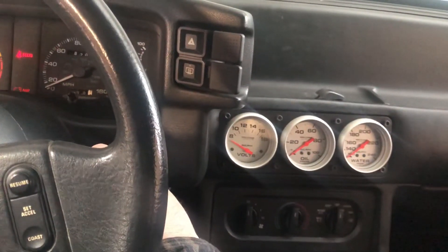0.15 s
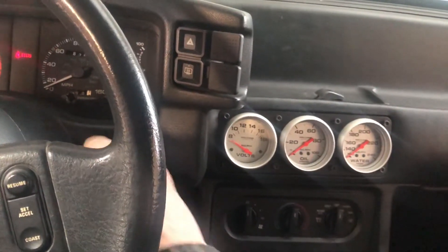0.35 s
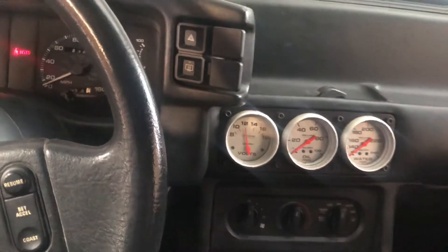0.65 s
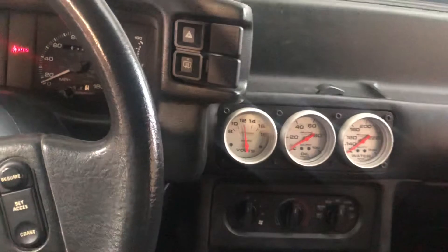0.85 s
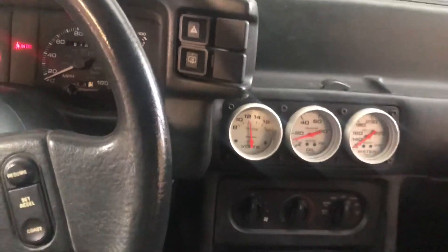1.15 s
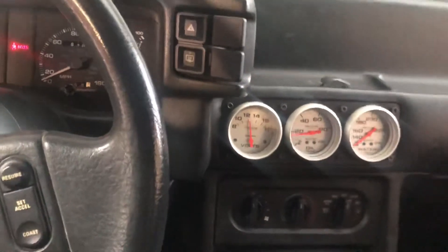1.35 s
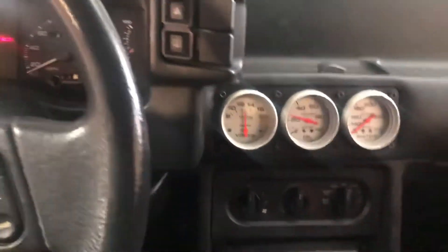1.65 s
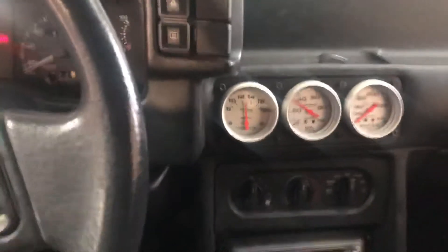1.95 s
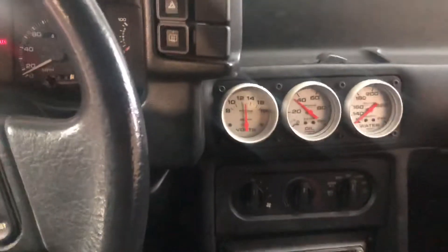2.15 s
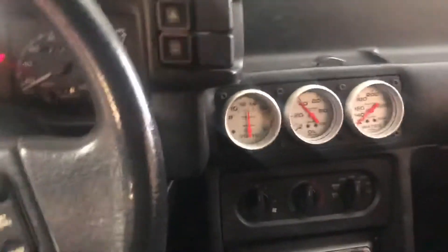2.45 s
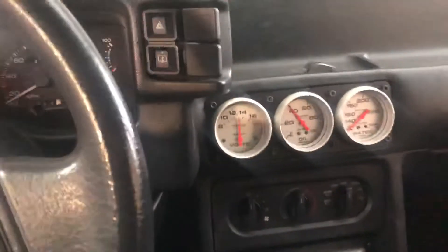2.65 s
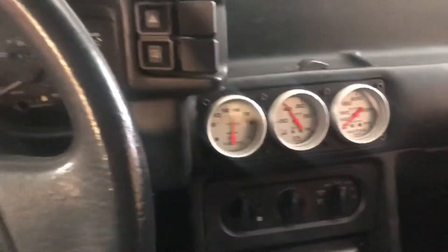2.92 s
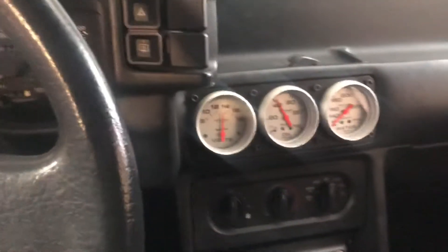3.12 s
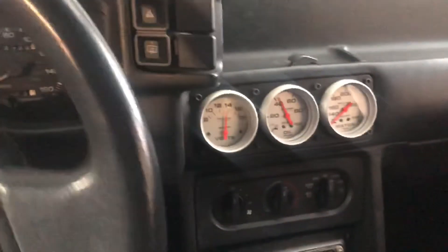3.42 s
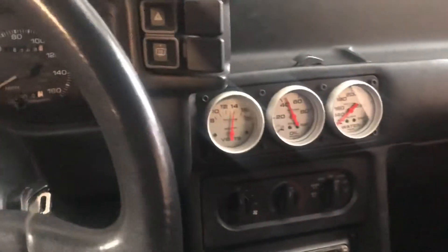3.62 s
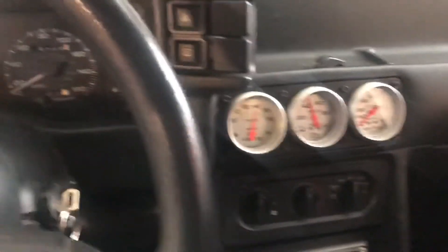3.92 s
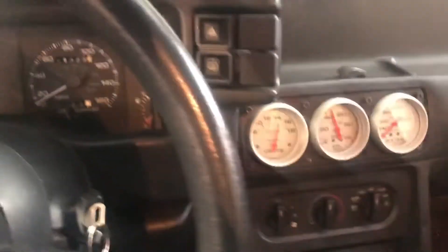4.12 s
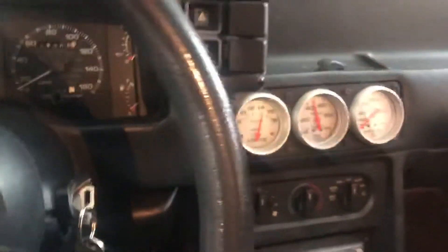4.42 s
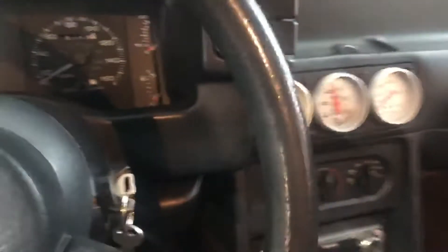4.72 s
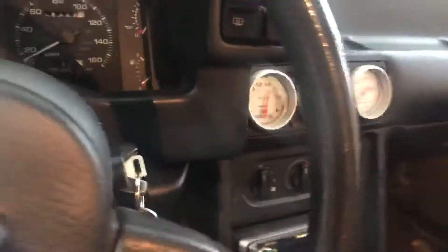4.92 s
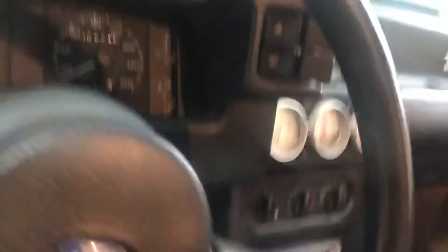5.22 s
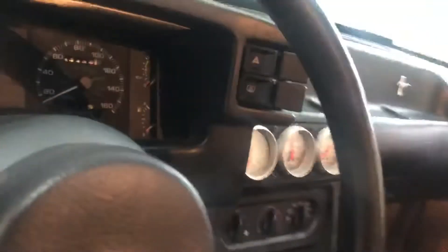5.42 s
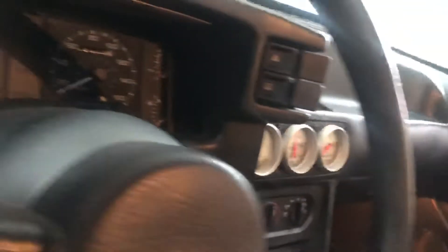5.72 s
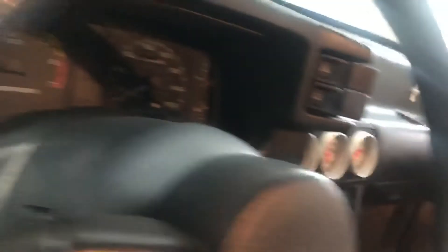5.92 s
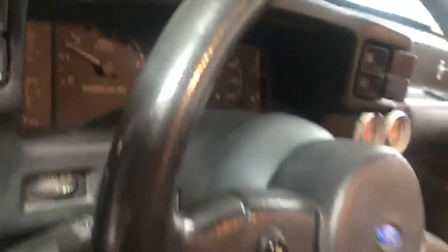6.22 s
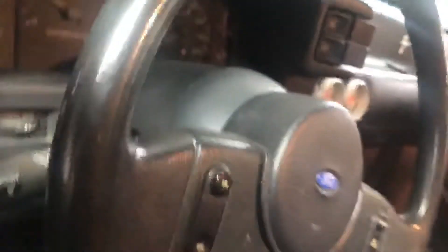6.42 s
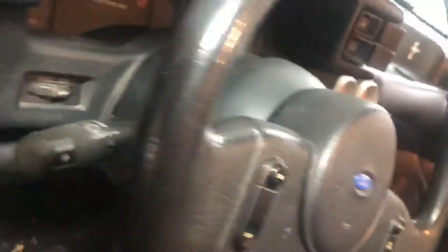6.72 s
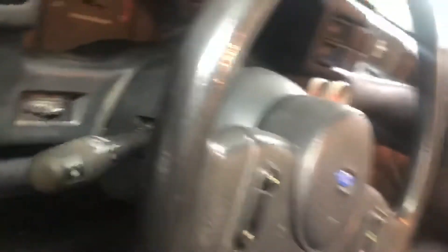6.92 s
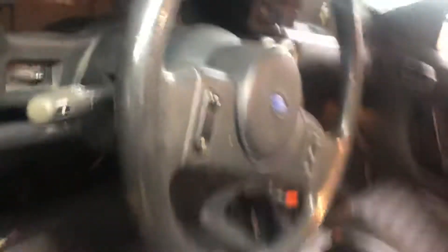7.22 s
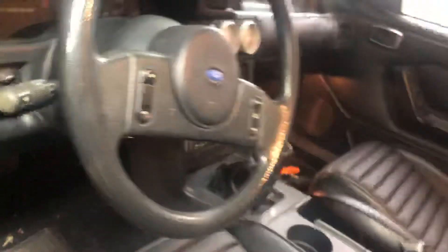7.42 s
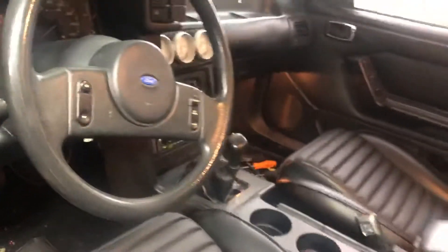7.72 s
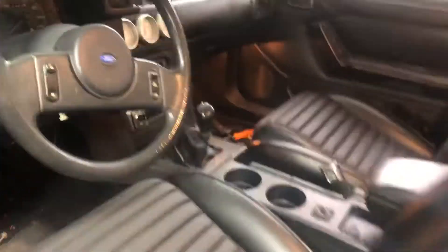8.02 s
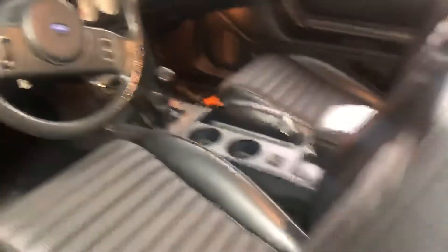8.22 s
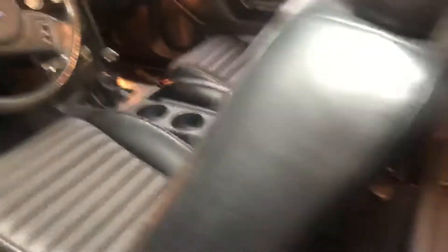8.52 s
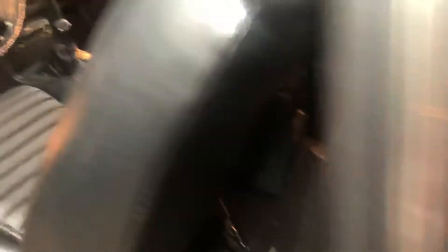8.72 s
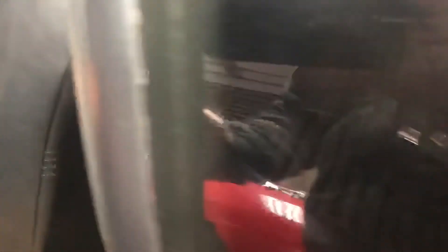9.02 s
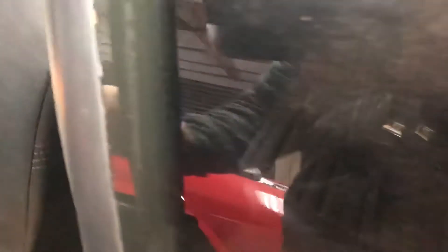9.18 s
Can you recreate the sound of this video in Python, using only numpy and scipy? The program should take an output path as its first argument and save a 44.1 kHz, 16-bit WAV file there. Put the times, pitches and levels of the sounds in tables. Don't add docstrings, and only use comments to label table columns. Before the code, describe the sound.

Close inside a parked car, a starter hums and grinds for a fraction of a second, then an eight-cylinder engine catches with a crack, flares loudly for about a second and settles to a throbbing, uneven fast idle. A sharp snap lands midway. Moving to the open door, the exhaust note grows stronger, brackets rattle, and the idle sags at the end.

```python
import sys
import numpy as np
from scipy import signal
from scipy.io import wavfile
from scipy.ndimage import uniform_filter1d

SR = 44100
rng = np.random.default_rng(int(sys.argv[2]) if len(sys.argv) > 2 else 0)


def how_loud(loudness_db):
    steps = np.asarray(loudness_db, float) / 20
    return 10 ** steps


def store_pcm(level_fs):
    pcm = np.round(np.clip(level_fs, -1, 1) * 32767).astype(np.int16)
    wavfile.write(sys.argv[1], SR, np.atleast_2d(pcm).T)


N = 412335


def rms_one(x):
    return x / np.sqrt(np.mean(x ** 2) + 1e-20)


def in_time(rows):
    s, *columns = np.transpose(rows)
    return [np.interp(np.arange(N) / SR, s, column) for column in columns]


def drift(rate_hz, size=1):
    r = np.exp(-80 * np.pi * rate_hz / SR)
    noise = rng.standard_normal(N // 40 + 2002)
    slow = signal.lfilter([1], [1, -2 * r, r * r], noise)[2000:]
    return np.interp(np.arange(0, N, size) / 40, np.arange(len(slow)), rms_one(slow))


def resonance(x, hz, width_hz):
    r = np.exp(-np.pi * width_hz / SR)
    ringing = [1, -2 * r * np.cos(2 * np.pi * hz / SR), r * r]
    return signal.lfilter([(1 - r * r) / 2, 0, (r * r - 1) / 2], ringing, x)


def rung(x, modes, skirt):
    out = 0
    for k, (hz, width_hz, db) in enumerate(modes):
        mode = resonance(resonance(x, hz, skirt * width_hz), hz, width_hz)
        out = out + (-1) ** k * how_loud(db) * rms_one(mode)
    return out / np.sqrt(uniform_filter1d(out ** 2, SR // 2))


def air_mode(puffs, hz, width_hz):
    mode = resonance(resonance(puffs, hz, width_hz), hz, width_hz)
    return mode / np.sqrt(uniform_filter1d(mode ** 2, SR // 10) + 1e-12)


def swell(rows):
    t = np.arange(0, N + 64, 64) / SR
    gain = 0
    for s, db, rise_s, fall_s in rows:
        away = np.maximum((s - t) / max(rise_s, .005), (t - s) / max(fall_s, .005))
        gain = gain + how_loud(db - 20 * away)
    return np.interp(np.arange(N) / SR, t, gain)


def coloured(spectrum, patchy_db):
    hz, db = np.transpose(spectrum)
    edges = np.geomspace(hz[0], hz[-1], int(4 * np.log2(hz[-1] / hz[0])) + 2)
    white, out = rng.standard_normal((2, N)), 0
    for k, (low, high) in enumerate(zip(edges, edges[1:])):
        band_pass = signal.butter(2, [low, high], "band", fs=SR, output="sos")
        band = signal.sosfilt(band_pass, white[k % 2])
        band_db = np.interp(np.log(low * high) / 2, np.log(hz), db)
        out = out + band * how_loud(band_db + patchy_db * drift(21.0))
    return rms_one(out)


def cabin(x, t60_s, wet_db):
    t = np.arange(SR // 4) / SR
    tail = rng.standard_normal(len(t)) * how_loud(-60 * t / t60_s) * (t > .002)
    wet = signal.fftconvolve(x, tail / np.sqrt(np.sum(tail ** 2)))[:N]
    return (x + how_loud(wet_db) * wet) / np.sqrt(1 + how_loud(2 * wet_db))


# time_s, hum_hz, hum_db, rumble_db, whine_db
STARTER_TURN = [
    (0, 262, -33, -40, -45),
    (.05, 254, -34, -42, -39.5),
    (.1, 265, -38, -48, -48),
    (.14, 270, -71, -70, -70),
]


def starter():
    hz, hum_db, rumble_db, whine_db = in_time(STARTER_TURN)
    noise, t = rng.standard_normal(N), np.arange(N) / SR
    hum = how_loud(hum_db) * np.sin(2 * np.pi * np.cumsum(hz) / SR)
    rumble = how_loud(rumble_db) * rms_one(resonance(noise, 210, 310))
    whine = how_loud(whine_db) * rms_one(resonance(noise, 1570, 98))
    brush_hiss = rms_one(resonance(resonance(noise, 8000, 9000), 8000, 9000))
    brush = how_loud(whine_db + 1) * np.clip(t / .04, 0, 1) * brush_hiss
    crack_gain = how_loud(-16.0 - 60 * np.abs(t - .108) / 0.18) * (t > .108)
    crack = crack_gain * rms_one(resonance(noise, 1800, 2100))
    return (hum + rumble + whine + brush) * (t < .15) + crack


GRIND_DB = 15


def starter_grind_db():
    t = np.arange(N) / SR
    let_go_s = 0.455
    meshed = GRIND_DB * np.clip(1 + (t - 0.12) / 0.12, 0, 1)
    spin_down = 10.5 * np.clip(1 - (t - let_go_s) / 0.55, 0, 1)
    return uniform_filter1d(np.where(t < let_go_s, meshed, spin_down), size=SR // 40)


# pitch_hz, level_db
GEAR_TONES = [(2471, -49), (2643, -45), (4538, -39), (4780, -42), (5313, -46), (5642, -48), (6255, -45),
              (6654, -45)]


def gear_song(grind_db):
    noise = rng.standard_normal(N)
    tones = sum(how_loud(db) * rms_one(resonance(noise, hz, 30)) for hz, db in GEAR_TONES)
    return how_loud(3.5 + 2.8 * (grind_db - GRIND_DB)) * tones


# time_s, change_db, half_width_s
FLURRIES = [(.15, 1.5, .07), (.125, 2, 0.015), (.162, 2.5, .012), (.215, 2.5, .02), (.265, 1.5, .012),
            (.37, 1, .015), (.41, 1, 0.018), (.31, -1.8, .03), (1.3, 2, .025), (3.5, 0.5, 0.024),
            (5.19, -1.5, 0.014), (6.17, 1.2, 0.076), (8.76, -2.5, 0.033), (9.02, -6.5, 0.055),
            (9.18, -8.5, 0.054), (9.3, 7, 0.014)]


def flurries_db():
    t = np.arange(0, N + 32, 32) / SR
    change_db = sum(db * np.exp(-((t - s) / width_s) ** 2) for s, db, width_s in FLURRIES)
    return np.interp(np.arange(N) / SR, t, change_db)


# start_s, level_db, pitch_hz, length_s
CLATTER = [(5.06, -36, 2300, .03), (5.085, -37, 2120, 0.032), (5.147, -41, 2210, .03),
           (5.221, -44, 2320, .02), (6.094, -37, 1770, .02), (6.389, -40, 1990, .02),
           (6.575, -36, 1400, .025), (6.67, -42, 2650, .03), (6.72, -39, 1930, .02), (6.76, -33, 1350, .02),
           (6.808, -40, 2500, .015), (6.915, -35, 2700, .012), (7.033, -40, 2280, 0.027),
           (7.08, -44, 2250, 0.045)]


def clatter(grit):
    out, t = np.zeros(N), np.arange(SR // 8) / SR
    for s, db, hz, length_s in CLATTER:
        at = round(s * SR)
        ring = rms_one(resonance(grit[at:at + len(t)], hz, 140))
        fade = how_loud(db - 20 * np.maximum(t - length_s, 0) / 0.013)
        out[at:at + len(t)] += fade * np.minimum(t / .004, 1) * ring
    return out


# pitch_hz, level_db (per Hz)
RASP = [(560, -74), (950, -12), (1000, -3.5), (1170, -3.5), (1440, -5), (2180, -7.5), (2820, -11),
        (3190, -12), (3630, -13), (4760, -12), (6000, -18.5), (7800, -25.5), (13200, -120)]
# pitch_hz, level_db (per Hz)
HISS = [(2940, -7), (5000, -8), (8470, -8.5), (15100, -10), (15700, -10)]
# pitch_hz, width_hz, level_db
COVERS = [(1536, 50, -16), (1930, 24, -26), (2240, 150, -12.5), (2470, 73, -30), (4520, 560, -21),
          (6970, 180, -28)]


def engine_bay(cycles, rasp_db, hiss_db):
    leak_opens = np.clip(np.arange(N) / SR - .3, 0, 1)
    puff = (np.exp(-2.5 * ((cycles - .48) % 1)) - .4) * leak_opens
    tick = np.exp(-3.0 * (8 * cycles % 1)) - .3
    grit = rng.standard_normal(N) * how_loud(2.5 * np.minimum(rng.exponential(1, N), 5))
    ringing = 0
    for hz, width_hz, db in COVERS:
        ringing = ringing + how_loud(db + 2.2 * drift(9.0)) * rms_one(resonance(grit, hz, width_hz))
    rasp = cabin(rms_one(coloured(RASP, patchy_db=2.5) + ringing), t60_s=0.067, wet_db=-8.0)
    hiss = cabin(coloured(HISS, patchy_db=2.0), t60_s=0.15, wet_db=-32.0)
    rasp = how_loud(rasp_db + 3.2 * puff + 0.38 * tick) * rasp
    hiss = how_loud(hiss_db + 3.4 * puff + 0.5 * tick) * hiss
    return rasp + clatter(grit) + hiss


# start_s, peak_db, fade_s
# (time to fall 60 dB)
SNAPS = [(0.0737, -13.5, 0.08), (0.1092, -12, 0.081), (1.2855, -35, 0.06), (3.6225, -14.5, 0.1),
         (5.0529, -28, 0.06), (5.221, -28, 0.06), (5.7019, -35, 0.06), (6.8783, -29, 0.06),
         (8.288, -34, 0.068), (8.8124, -30, 0.06), (8.8712, -32.5, 0.06), (9.0867, -28, 0.049),
         (9.275, -40, 0.06), (9.2965, -29, 0.053)]


def snaps():
    envelope, t = np.zeros(N), np.arange(SR // 5) / SR
    for s, db, fade_s in SNAPS:
        at = round(s * SR)
        burst = how_loud(db - 9.5 - 60 * t / max(fade_s, .005)) * np.minimum(t / 0.0021, 1)
        envelope[at:at + len(t)] += burst[:N - at]
    band_pass = signal.butter(1, [2500, 10000], "band", fs=SR, output="sos")
    return envelope * rms_one(signal.sosfilt(band_pass, rng.standard_normal(N)))


def firing_note(cycles, note_db):
    phase = 2 * np.pi * 8 * cycles + .15 * drift(4) + .4
    return how_loud(note_db + .5 * drift(12)) * np.sqrt(2) * np.cos(phase)


# pitch_hz, half_width_hz, lift_db
DOORWAY = [(104, 15, 10), (283, 19, 11.5), (235, 28, -6)]


def doorway_db(hz):
    return sum(db * np.exp(-((hz - mid_hz) / width_hz) ** 2) for mid_hz, width_hz, db in DOORWAY)


# multiple, level_db
SEAT_ORDERS = [(1, -50), (2, -47), (3, -23), (4, -43), (5, -3.5), (6, -16), (7, -44), (8, 0), (9, -8),
               (10, -13), (11, -4.5), (12, -20), (13, -19.5), (14, -28), (15, -50), (16, -20), (17, -24.5),
               (18, -25), (19, -12), (20, -36), (21, -12), (22, -40), (23, -24.5), (24, -27), (25, -26.5),
               (26, -24), (27, -38), (28, -23), (29, -72), (30, -56)]
# multiple, level_db
DOOR_ORDERS = [(1, -57), (2, -60), (3, -92), (4, -68), (5, -41), (6, -36), (7, -24), (8, 0), (9, -22),
               (10, -14), (11, -20), (12, -58), (13, -74), (14, -66), (15, -47), (16, -26), (17, -53),
               (18, -44), (19, -43), (20, -64), (21, -23), (22, -22.5), (23, -25.5), (24, -21), (25, -25.5),
               (26, -33), (27, -39), (28, -47), (29, -30), (30, -51)]
# multiple, level_db
OUTSIDE_ORDERS = [(1, -61), (2, -56), (3, -49), (4, -47), (5, -22), (6, -36), (7, -21), (8, 0), (9, -16),
                  (10, -16), (11, -16.5), (12, -43), (13, -27), (14, -38), (15, -43), (16, -36), (17, -27),
                  (18, -39), (19, -42), (20, -49), (21, -21), (22, -28), (23, -27), (24, -9.5), (25, -18.5),
                  (26, -22), (27, -17), (28, -21), (29, -26), (30, -28.5)]
# multiple, seat_db, door_db, outside_db
UPPER_ORDERS = [(32, -35, -35, -39), (33, -28, -33, -38), (34, -38.5, -31, -36), (35, -34.5, -40, -32),
                (36, -38, -38, -43), (37, -32, -44, -29), (38, -24, -42, -45), (39, -30.5, -38, -49),
                (40, -32, -24.5, -38), (41, -35, -25, -43), (42, -36, -36, -38), (43, -32.5, -36, -38),
                (44, -42, -30, -41), (45, -36, -57, -48), (46, -41, -36, -32), (47, -33, -46, -42),
                (49, -40, -45, -44), (50, -35.5, -38, -47), (51, -38, -38, -39), (53, -35, -35, -36),
                (54, -39, -40, -46), (56, -29.5, -34.5, -52), (57, -37, -38, -43), (59, -36, -39, -44),
                (61, -34.5, -46, -31), (62, -34, -42, -50), (62.2, -37, -53, -43), (65.14, -39.5, -33, -52),
                (67.53, -45, -32, -39)]
# pitch_hz, gain_db
CABIN = [(35, -3), (62, -10), (82, -8), (108, -6.5), (165, -6), (195, -19), (225, -15.5), (260, -9.5),
         (295, -18), (325, -1), (355, -9.5), (620, -24)]
# multiple, change_db (at full flare)
RACING = [(1, 0), (4, 0), (5, -9), (6, 15), (7, -4), (9, -4.5), (10, 6.5), (11, 0), (12, 3), (13, 4),
          (14, 11), (16, 6), (19, -3), (21, -11), (24, 0), (26, 13), (30, 3), (40, -5), (67, -2)]
# multiple, leaning_db (from the seat), half_way_db (to the door)
LEANING = [(5, -2, -2), (7, 8, -3), (9, 4, 0), (12, -2, 6), (13, 3, 2), (16, -5.5, 1.5), (17, 5, 0),
           (19, -3, 3), (20, 8, 0), (21, 2, -0.5), (22, 3, 7), (23, 3.5, 1), (24, 3.5, -2), (39, 2, -8),
           (40, -3, 4.5), (41, 0, -5), (42, 0, 6.5)]


def lope(cycles, per_s, place, lope_db):
    cycles, cycle_hz, place = cycles[::8], per_s[::8] / 8, np.minimum(place[::8], 2)
    settled_hz = np.interp(place, [0, 1, 2], [13.2, 12.4, 11.9])
    cabin_hz, cabin_db = np.transpose(CABIN)
    scatter = rng.uniform(-np.pi, np.pi, len(SEAT_ORDERS) + len(UPPER_ORDERS))
    lower = []
    for (k, seat), (_, door), (_, outside) in zip(SEAT_ORDERS, DOOR_ORDERS, OUTSIDE_ORDERS):
        lower.append((k, seat, door, outside))

    leaning = np.interp(place, [.065, .11, .16, .4], [0, 1, 1, 0])
    half_way = np.interp(place, [.2, .6, .75, 1.1], [0, 1, 1, 0])
    on_the_way = {k: leaning * lean_db + half_way * half_db for k, lean_db, half_db in LEANING}
    racing = np.clip((cycle_hz - 13.6) / 2.5, 0, 1)
    racing = np.maximum(racing, np.clip(4.5 - cycles, 0, 1))

    out = 0
    for (k, seat_db, door_db, out_db), turn in zip(lower + UPPER_ORDERS, scatter):
        k = round(k)
        upper = k > len(lower)
        now_hz, usual_hz = k * cycle_hz, k * settled_hz
        moved_db = np.interp(now_hz, cabin_hz, cabin_db) - np.interp(usual_hz, cabin_hz, cabin_db)
        moved_db = np.minimum(moved_db, 25 * np.maximum(1 - place, .05))
        moved_db = moved_db + np.clip(place - 1, 0, 1) * (doorway_db(now_hz) - doorway_db(usual_hz))
        level_db = np.interp(place, [0, 1, 2], [seat_db, door_db + 8, out_db + 9])
        level_db = level_db + on_the_way.get(k, 0) + moved_db
        level_db = level_db + racing * np.interp(k, *np.transpose(RACING))
        level_db = level_db + 2 * upper * np.minimum(1, 3 - 2 * place) + 1.1 * drift(3.8, size=8)

        if upper:
            lined_up = 2 * np.pi * k * 0.0799 + (0.31 + place) * turn
        elif k % 8 == 0:
            lined_up = .1 * k
        else:
            bass_lag = .12 * max(8 - k, 0) ** 2
            lined_up = turn * np.clip((k - 11) / 8, .05, 1) + 1.96 * place * turn - bass_lag
        phase = 2 * np.pi * k * cycles + lined_up + 0.0094 * k * drift(5.7, size=8)
        if k != 8:
            out = out + how_loud(level_db) * np.cos(phase)
    return how_loud(lope_db) * signal.resample_poly(out, 8, 1)[:N]


# peak_s, level_db, rise_s, fall_s, pitch_hz
JOLTS = [(.15, -20, .04, .088, 363), (.42, -21, .15, 0.26, 537), (.47, -20.5, .2, .2, 500),
         (.64, -22, .1, 0.5, 258), (.74, -26, .1, 0.36, 451), (.89, -27, .15, .15, 492),
         (.93, -20, .3, 0.1, 256.3), (1.3, -28.5, .2, 0.5, 325.5), (5.3, -31, .4, .5, 556),
         (5.6, -35, .5, .5, 705), (8.66, -29, .3, .3, 190), (8.95, -23, .4, -0.1, 284),
         (9.19, -30, 0.09, -0.3, 279), (9.33, -24, 0.11, 1, 275)]


def jolts(puffs):
    out = np.zeros(N)
    for s, db, rise_s, fall_s, hz in JOLTS:
        near = slice(max(round((s - 1) * SR), 0), round((s + 1) * SR))
        gain = swell([(s, db, rise_s, fall_s)])[near]
        out[near] += gain * air_mode(puffs[near], hz, width_hz=15)
    return out


# pitch_hz, width_hz, level_db
PIPES = [(62, 45, -9), (104.6, 56, 0.5), (152, 65, -4), (253, 63.4, -2), (276.7, 47, -3), (465, 64, -16),
         (852, 130, -21)]
# peak_s, level_db, rise_s, fall_s (per 20 dB)
BOOM = [(.125, -10, .1, 0.1), (.768, -6.5, 0.42, 0.3), (1.132, -18, 0.059, 0), (1.27, -14, 0.12, 0.2),
        (1.412, -14, 0.14, 0.3), (1.562, -20, 0.15, 0), (1.7, -24, .09, -0.5), (1.95, -16, 0.14, -0.2),
        (2.8, -13.5, 0.17, 0.3), (3.63, -17.5, .15, 0.3), (5.1, -19.5, .3, 1.3), (6.74, -23, .12, .12),
        (9.02, -25.5, 0.54, .2)]
# peak_s, level_db, rise_s, fall_s (per 20 dB)
BARK = [
    (.22, -10.5, 0.05, 0.5),
]


def uneven_firings(cycles, rough_db):
    fired = np.flatnonzero(np.diff(np.floor(8 * cycles)))
    draw = rng.standard_normal((len(fired), 2))
    puffs = np.full(N, 1e-18)
    puffs[np.clip(fired + (30 * draw[:, 1]).astype(int), 0, N - 1)] = draw[:, 0] + 0.21
    beat = np.zeros(N)
    beat[np.flatnonzero(np.diff(np.floor(cycles)))] = 1
    alternate = beat * (-1) ** np.floor(cycles)
    boom = swell(BOOM) * how_loud(-3.5) * air_mode(puffs + how_loud(8) * alternate, hz=61.3, width_hz=12)
    bark = swell(BARK) * air_mode(puffs + how_loud(6.5) * beat, hz=161.5, width_hz=9.3)
    return how_loud(rough_db - 2.5) * rung(puffs, PIPES, skirt=3.24) + boom + bark + jolts(puffs)


# pitch_hz, width_hz, level_db
PANELS = [(363, 31, 8.5), (397, 53, 4), (454, 52, 5), (614, 58, 4.5), (672, 56, 3.5), (749, 94, 6.5),
          (809, 34, 6.5), (839, 53, 2), (934, 130, -1.5), (1027, 94, -2.5), (1205, 81, 1.5)]
# pitch_hz, width_hz, level_db
DOOR_SKIN = [(491, 14, -0.5), (515.3, 18, -6), (548, 9.3, -3.5)]


def panels(cycles, panel_db, skin_db):
    count = np.floor(8 * cycles)
    fired = np.flatnonzero(np.diff(count))
    cylinder = np.arange(8)
    habit = .35 + .9 * np.cos(2 * np.pi * 3 * cylinder / 8) + .5 * np.cos(np.pi * cylinder / 2)
    habit = habit + .2 * rng.standard_normal(8)
    knocks = how_loud(-28.0) * rng.standard_normal(N)
    strength = 1 + 0.17 * rng.standard_normal(len(fired))
    knocks[fired] += habit[count[fired].astype(int) % 8] * strength
    sheets = how_loud(panel_db - 0.5) * rung(knocks, PANELS, skirt=1.46)
    return sheets + how_loud(skin_db - 1.5) * rung(knocks, DOOR_SKIN, skirt=3.6)


# time_s, firings_per_s
FLARE = [
    (0, 48),
    (.15, 66.4),
    (.3, 114),
    (.43, 153),
    (.53, 164),
    (.7, 150),
    (.85, 128),
    (1.0, 113),
    (1.3, 107),
]
# time_s, firings_per_s
IDLE = [(1.8, 107.2), (2.1, 102.5), (2.45, 106.2), (3.3, 105.9), (3.75, 104.9), (4.3, 105.5), (4.9, 107.3),
        (5.3, 103.1), (5.7, 100.3), (6.1, 101.7), (6.5, 100.2), (7.0, 99.8), (7.3, 98.5), (7.7, 98.6),
        (8.1, 96.1), (8.5, 94.4), (8.75, 91.5), (9.35, 72.5)]


def engine_speed():
    per_s, = in_time(FLARE + IDLE)
    late = ((np.arange(N) / SR - 2.83) / .15) ** 2
    return per_s + 1.8 * (2 * late - 1) * np.exp(-late)


# time_s, load_db
LOAD = [
    (.06, -17),
    (.14, 0),
    (.26, 6),
    (.35, 8),
    (.48, 8.5),
    (.6, 4.5),
    (.76, -1),
    (.96, -10.5),
    (1.2, -1.5),
]
# time_s, place (0 seat, 1 door, 2 stepping out, 3 turning away), note_db, bonnet_db
LISTENER = [(1.2, 0, -19, -38.5), (1.8, 0.042, -16.5, -37), (3.6, 0.06, -16.5, -37.5),
            (4.0, 0.07, -13.5, -37), (4.9, 0.25, -11.5, -36.5), (5.25, 0.45, -10.5, -35),
            (5.7, 0.73, -9, -34.5), (6.1, 0.68, -10, -34), (6.9, 1.1, -6.5, -31.6), (7.6, 1.32, -5.5, -33),
            (8.15, 1.9, -5.5, -34.5), (8.68, 3, -7.5, -36), (8.95, 2.5, -18, -39), (9.14, 2.6, -19.5, -37),
            (9.27, 2.8, -13, -39.5), (9.35, 3, -11.5, -41.5)]
# place, lope_db, uneven_db, panels_db (over bonnet), skin_db (over panels)
HEARD = [
    (0, -15.5, -28.5, 2, -6),
    (.15, -12, -22.5, 1, 1),
    (.5, -12.5, -24, 2.5, 4.5),
    (.9, -10.5, -23, 0, 1.5),
    (1.3, -13.5, -22.5, 3, -8),
    (1.8, -16.5, -24.5, 4.5, -19),
    (2, -17, -24, 4.5, -14.5),
    (2.3, -18, -17.5, 5, -12),
    (2.6, -17, -24, 4.5, -19),
    (3, -19, -23, 3, -10),
]


def scene():
    per_s, t = engine_speed(), np.arange(N) / SR
    load_db, = in_time(LOAD)
    place, note_db, bonnet_db = in_time(LISTENER)
    place = np.clip(place, 0, 3)
    at, *columns = np.transpose(HEARD)
    lope_db, rough_db, panel_db, skin_db = [np.interp(place, at, column) for column in columns]
    flurry_db, grind_db = flurries_db(), starter_grind_db()
    falter_db = np.minimum(flurry_db, 0)

    cold_db = 13 * np.exp(-np.maximum(t - .9, 0) / .8) * np.clip((t - .07) / 0.095, 0, 1)
    lope_db = lope_db + 0.32 * load_db + .4 * falter_db
    rough_db = rough_db + 0.11 * load_db + cold_db
    panel_db = panel_db + bonnet_db + 0.14 * load_db + 0.76 * grind_db + falter_db
    skin_db = skin_db + panel_db + 0.13 * load_db + 0.14 * cold_db
    rasp_db = bonnet_db + flurry_db + grind_db
    hiss_db = bonnet_db - 6.5 + 1.3 * flurry_db + 1.26 * grind_db + 0.17 * np.minimum(load_db, 0)

    cycles = np.cumsum(per_s) / 8 / SR + 0.423
    caught = np.clip((t - .075) / 0.045, 0, 1)
    starting = starter() + gear_song(grind_db)
    bay = engine_bay(cycles, rasp_db, hiss_db)
    exhaust = firing_note(cycles, note_db + load_db) + lope(cycles, per_s, place, lope_db)
    exhaust = exhaust + uneven_firings(cycles, rough_db)
    body = panels(cycles, panel_db, skin_db)
    return (starting + bay + snaps() + caught * (exhaust + body))[None]


def band_limit(x):
    return signal.sosfilt(signal.butter(12, 16890, fs=SR, output="sos"), x)


def record(dry):
    bass_cut = signal.butter(2, 40, "high", fs=SR, output="sos")
    top_cut = signal.ellip(10, .5, 70, 15680, fs=SR, output="sos")
    x = signal.sosfilt(bass_cut, dry)
    rounded = 1.213 * np.tanh(x / 1.104)
    mix = signal.sosfilt(top_cut, rounded)
    return band_limit(mix)


dry = scene()
out = record(dry)
store_pcm(out)
```